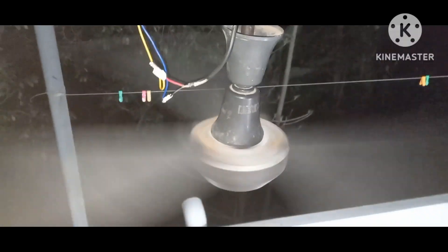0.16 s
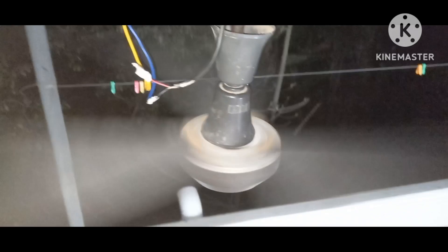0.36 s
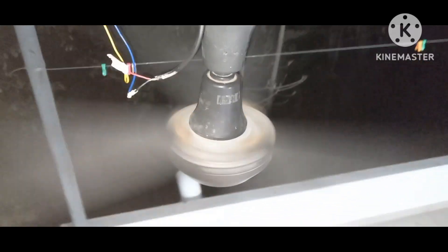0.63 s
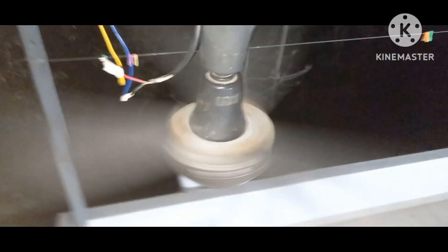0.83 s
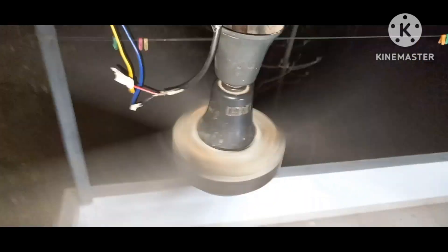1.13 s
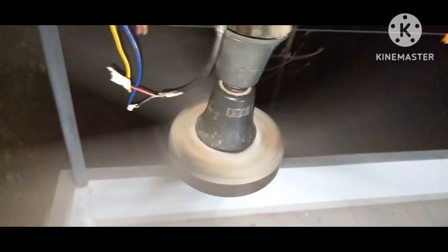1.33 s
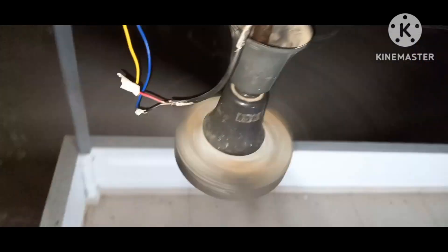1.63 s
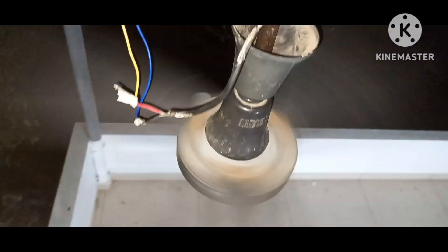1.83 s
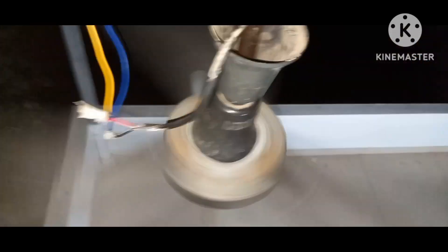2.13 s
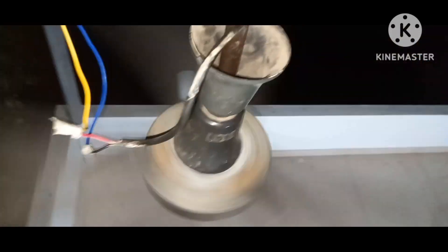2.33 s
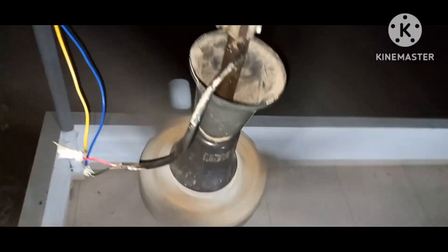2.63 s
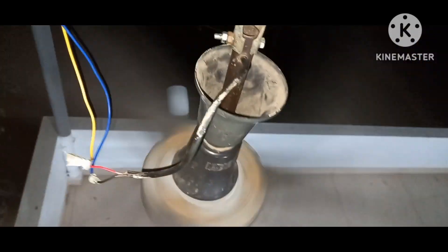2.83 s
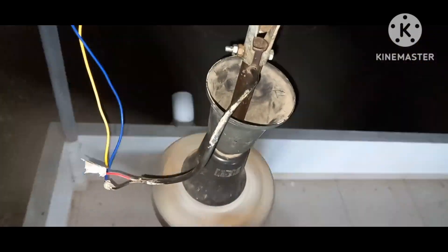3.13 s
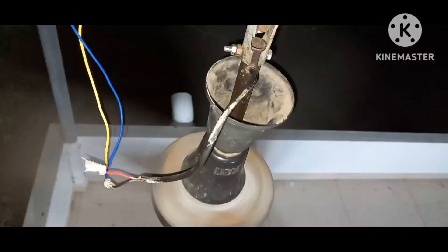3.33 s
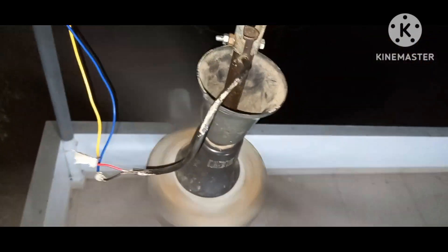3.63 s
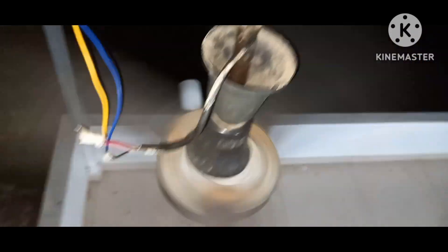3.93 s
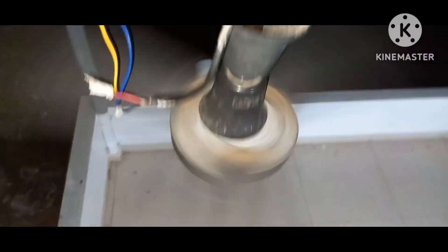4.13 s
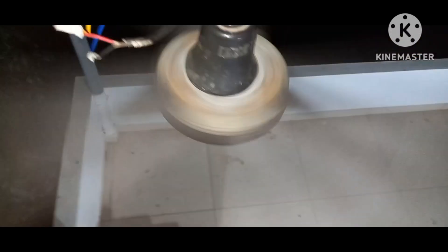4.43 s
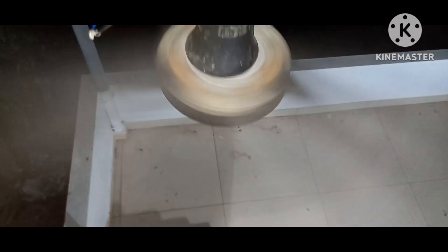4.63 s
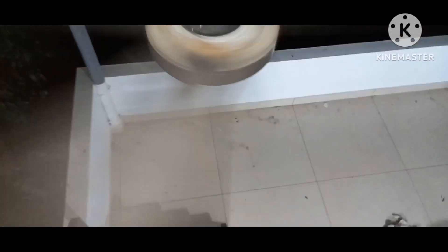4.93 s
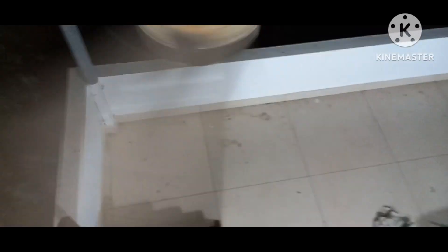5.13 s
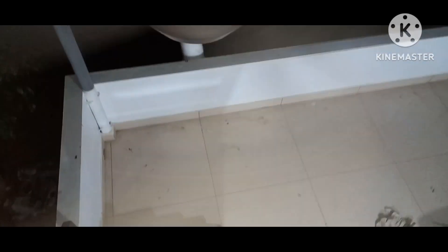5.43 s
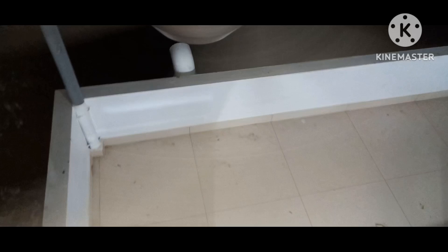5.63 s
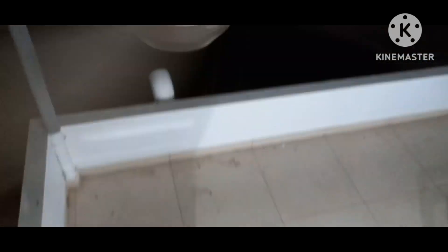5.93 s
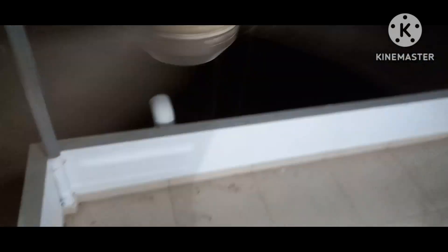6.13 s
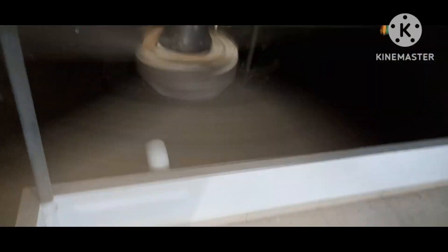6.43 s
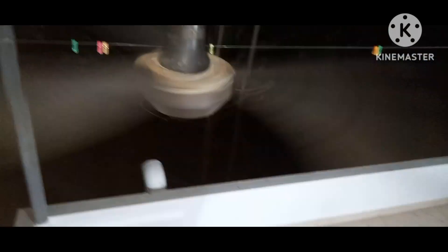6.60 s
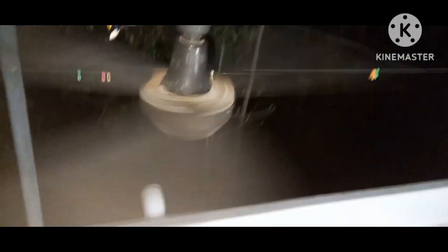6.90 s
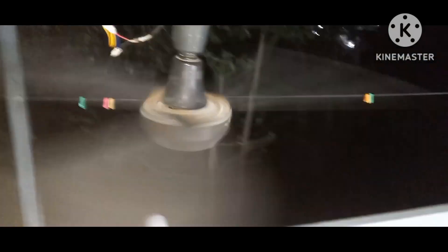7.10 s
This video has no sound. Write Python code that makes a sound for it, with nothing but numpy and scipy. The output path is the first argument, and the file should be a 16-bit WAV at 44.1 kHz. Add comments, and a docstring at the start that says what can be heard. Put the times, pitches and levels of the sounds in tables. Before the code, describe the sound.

Close, rapidly pulsing rush of air from a fast ceiling fan, with wind thumps, a faint motor whirr and high insect trilling.

```python
"""A throbbing rush of air: a three-blade ceiling fan at full speed on a roofed terrace at night.
Turbulence makes each blade swish and a pressure pulse follows it. As the microphone is lifted past the
blades and lowered again, interference with the roof's echo sweeps the rush and the draught buffets the
ports. The motor sings faintly, vortices shed at the blade edges whistle now and then, and insects
shrill in the trees with their resonant wings."""
import sys
import numpy as np
from scipy import signal
from scipy.fft import rfft, irfft, next_fast_len
from scipy.io import wavfile
from scipy.ndimage import uniform_filter1d, map_coordinates

SR = 44100
rng = np.random.default_rng(int(sys.argv[2]) if len(sys.argv) > 2 else 0)


def to_wav(sig):
    """Store sig (one row per channel, or 1-D mono) as 16-bit WAV at the path in sys.argv[1].

    Samples outside -1..1 are clipped; the rate is SR.
    """
    pcm = np.clip(np.atleast_2d(sig), -1, 1) * 32767
    pcm = np.round(pcm).astype(np.int16)
    wavfile.write(sys.argv[1], SR, pcm.T)  # frames by channels


N = 320166
TIME = np.arange(N) / SR
BLADE_HZ = 15.2  # blade passes a second

# the microphone's path: (time [s], delay of the roof's echo [ms], place round the hub [blade gaps])
MIC_PATH = [(0, 1.31, 0.52), (.9, 1.24, 0.74), (1.6, 1, 0.72), (2.2, 0.77, 0.608), (3.5, 0.42, 0.6),
            (4, 0.52, 0.81), (4.4, 0.99, .83), (4.9, 1.23, 0.798), (5.5, 1.41, 0.98), (6.3, 1.57, 1),
            (7.26, 1.61, 0.96)]
# base levels of the fan at the microphone: (time [s], high rush [dB], low rush [dB])
RUSH_LEVELS = [(0.1, -46, -32.5), (0.68, -45, -31.5), (1.05, -40, -26), (1.35, -38, -24),
               (1.6, -41.5, -28.5), (2.3, -40.5, -27), (2.95, -40.5, -26.5), (3.52, -37, -24),
               (3.8, -40.0, -25.5), (4.5, -38.5, -25), (5.25, -38.5, -26), (5.7, -37, -22.5),
               (6.25, -36, -21.5), (6.65, -39, -23.5), (7.02, -38, -23.5), (7.25, -42, -22.5)]


def amp(db):
    """Decibels to amplitude ratio."""
    return 10 ** (np.asarray(db) / 20)


def unit(x):
    """Normalisation to rms 1."""
    return x / np.sqrt(np.mean(x ** 2) + 1e-20)


def along(points, hz):
    """Interpolation of (frequency [Hz], value) points on a logarithmic axis."""
    knots_hz, values = np.transpose(points)
    return np.interp(np.log(hz + 1), np.log(knots_hz + 1), values)


def curves(rows):
    """Linear interpolation in time: one value per sample for each column after the first."""
    times, *columns = np.transpose(rows)
    return [np.interp(TIME, times, column) for column in columns]


def spell(at, length):
    """A Gaussian envelope of height 1; length is its full width at 1/e."""
    return np.exp(-(2 * (TIME - at) / length) ** 2)


def wobble(rate):
    """Smooth random modulation, rate knots a second."""
    return map_coordinates(rng.standard_normal(int(N * rate / SR) + 4), [TIME * rate])


def filtered(x, response):
    """Linear filtering: the spectrum of x times a frequency response."""
    size = next_fast_len(N + SR // 2)
    return irfft(rfft(x, size) * response(np.fft.rfftfreq(size, 1 / SR)), size)[..., :N]


def colour(x, spectrum):
    """Spectral shaping, cut off at the spectrum's last point, at rms 1."""
    return unit(filtered(x, lambda hz: amp(along(spectrum, hz)) * (hz < spectrum[-1][0])))


def stereo_noise():
    """Partial coherence: white noise whose two sides are alike only at long wavelengths."""
    # likeness of left and right: (frequency [Hz], correlation [ratio])
    coherence = [(30, 0.37), (80, 0.9), (170, 0.98), (330, 0.85), (650, 0.73), (1200, 0.17), (2500, 0.05),
                 (5000, 0)]

    def mid_side_gains(hz):
        angle = np.arccos(np.clip(along(coherence, hz), -1, 1)) / 2
        return np.array([np.cos(angle), np.sin(angle)])

    mid, side = filtered(rng.standard_normal((2, N)), mid_side_gains)
    return np.array([mid + side, mid - side])


def delayed(x, delay_ms):
    """Propagation delay over a path of changing length."""
    return np.array([np.interp(TIME - delay_ms / 1000, TIME, side) for side in x])


def insects(chirp_hz, chirp_db, stroke_db, tooth_db):
    """Stridulation: wing strokes, three to a chirp, modulate narrow resonances; one insect stands out."""
    # base level of the shrill treble: (time [s], level [dB])
    levels = [(.1, -49.5), (.7, -51.5), (1.05, -43), (1.38, -43), (1.58, -48.5), (3.5, -44.5),
              (3.85, -46.5), (5.2, -45.5), (5.94, -41.5), (6.65, -44), (7.26, -42)]
    # spectra of the chorus, the nearest wing and a higher wing: (frequency [Hz], density [dB])
    chorus_band = [(5600, -41.5), (6250, -14.5), (6500, 0.5), (6700, 2), (7050, -0.5), (7300, -4.5),
                   (7600, -6), (7900, -10), (8300, -27.5)]
    near_band = [(6200, -43), (6480, -7.5), (6660, 1), (6870, -6), (7070, -2.5), (7200, -17), (7400, -51)]
    high_band = [(7350, -39), (7520, -7), (7620, 1.5), (7720, -7), (7900, -40)]
    # faint thin bands near 9 and 15 kHz that follow the shrill's level: (frequency [Hz], density [dB])
    thin_bands = [(8700, -57.5), (9150, -4.5), (9400, 2.5), (9600, -21), (9900, -45), (14400, -44),
                  (14900, -8.5), (15400, -12.5), (15700, -31.5)]
    level_db, = curves(levels)
    phase = 2 * np.pi * (chirp_hz * TIME + 0.27 * wobble(2.7))
    pulse_db = chirp_db * np.cos(phase)
    strokes = np.cos(3 * phase) + 0.49 * np.cos(4 * phase)
    chorus = colour(stereo_noise(), chorus_band)
    chorus = unit(chorus * amp(pulse_db + 2.0 * strokes + tooth_db * wobble(400)))
    wing = colour(rng.standard_normal((2, N)), near_band)
    nearest = amp(-5.0) * unit(wing * amp(pulse_db + stroke_db * strokes))
    high_call = amp(-10.5) * spell(at=3.4, length=1.2) * colour(stereo_noise(), high_band)
    thin_treble = amp(-23.0) * colour(stereo_noise(), thin_bands)
    return amp(level_db + 1.5) * (chorus + nearest + high_call + thin_treble)


def motor(waver_rad, shell_db_per_ms, tone_db_per_ms, whirr_db, wander):
    """Resonance: the motor's shell whirrs beside its unsteady tones; both are clearest from above."""
    # the motor's tones: (frequency [Hz], base level [dB])
    partials = [(1136, -51), (2280, -52.5), (2375, -55.5)]
    # resonances of the shell: (frequency [Hz], bandwidth [Hz], base level [dB])
    modes = [(434.4, 27, -41.5), (486.8, 170, -40), (1310, 44, -48), (1637, 99, -45), (1925, 160, -52.5),
             (2290, 220, -52.5)]
    tones = np.zeros((2, N))
    for hz, db in partials:
        gain = amp(db + 3.6 * np.array([wobble(16.0), wobble(3.1)]))
        tones += gain * np.sin(2 * np.pi * hz * TIME + waver_rad * wobble(24))
    shell = np.zeros((2, N))
    for hz, width, db in modes:
        ring = filtered(stereo_noise(), lambda f: 1 / (1 + (2 * (f - hz) / width) ** 2))
        clock = np.cumsum(1 + wander * width / hz * wobble(BLADE_HZ))  # an uneven pace bends the pitch
        ring = np.array([map_coordinates(side, [clock], order=1, mode="mirror") for side in ring])
        shell += amp(db) * unit(ring * amp(whirr_db * wobble(2 * BLADE_HZ)))
    roof_ms = curves(MIC_PATH)[0]
    tones *= unit(amp(-tone_db_per_ms * roof_ms))
    shell *= unit(amp(-shell_db_per_ms * roof_ms))
    nearness = unit(amp(curves(RUSH_LEVELS)[0]))
    return nearness * (tones + shell)


def edge_whistle(waver, grain_db):
    """Vortex shedding at the blade edges gives narrow-band noise that swells, fades and wavers."""
    # whistling spells: (time [s], length [s], pitch [Hz], bandwidth [Hz], level [dB])
    whistles = [(1.901, .12, 4730, 621.4, -47), (2.25, 0.71, 4680, 618, -46.5),
                (4.246, 0.45, 5060, 617, -47.5), (6.125, 0.07, 4860, 580, -31),
                (6.181, 0.21, 4860, 652, -42), (6.345, 0.12, 4910, 756, -39), (7.038, 0.5, 4680, 383, -46)]
    times, _, hz, width_hz, _ = np.transpose(whistles)
    level = np.sqrt(sum((amp(db) * spell(at, length)) ** 2 for at, length, _, _, db in whistles))
    width = np.interp(TIME, times, width_hz)
    pitch = np.interp(TIME, times, hz) + waver * width * wobble(50)
    clock = np.cumsum(width) / SR
    vortices = np.array([map_coordinates(side, [clock]) for side in rng.standard_normal((2, N // 20))])
    carrier = np.sin(2 * np.pi * np.cumsum(pitch) / SR)
    return level * unit(vortices * carrier * amp(grain_db * wobble(140)))


def panned(db, pan_db):
    """Left and right gains with a level difference of pan_db."""
    return amp([[db + pan_db / 2], [db - pan_db / 2]])


def draught(lumps_db):
    """Turbulent pressure buffets each port on its own; a light flow and gusts add in power."""
    # gusts across the ports: (time [s], length [s], level [dB], left minus right [dB])
    gusts = [(0.854, 0.16, -32, -9), (1.125, 0.38, -26.5, 13.5), (1.403, 0.28, -21, 0.5),
             (1.81, 0.89, -28.5, -19), (2.19, 0.12, -27.5, 14), (3.686, 0.17, -25.5, 2),
             (3.937, 0.98, -25, -8)]
    # spectrum of the buffeting: (frequency [Hz], density [dB])
    buffet_band = [(15, -25), (33, -18), (55, -20.5), (68, 1), (78, -0.5), (98, -1), (113, -11.5),
                   (135, -2.5), (160, -7.5), (230, -14), (320, -17), (480, -35.5)]
    flow = amp(curves(RUSH_LEVELS)[0] + 4.5)
    gust_power = sum((panned(db, pan_db) * spell(at, length)) ** 2 for at, length, db, pan_db in gusts)
    lumps = amp(lumps_db * np.array([wobble(22), wobble(22)]))
    buffeting = unit(lumps * colour(rng.standard_normal((2, N)), buffet_band))
    return np.sqrt(flow ** 2 + gust_power) * buffeting


def eddies(cycles, thump_hz, shortening):
    """An eddy on the microphone is a brief pressure wavelet: the smaller, the higher and more abrupt. A few of
    the low knocks are pulses of passing blades, played the same way."""
    # low thumps and sharp slaps, among them a few low knocks of passing blades: (time [s], relative peak [dB],
    # pitch [Hz], left minus right [dB])
    impacts = [(.742, -9, 600, 2), (1.007, -10, 149, 6), (1.09, -11, 99, 19), (1.177, -7, 91, 17),
               (1.267, -6.5, 134, 13), (1.366, -5, 107, -6), (1.42, -21, 50, 0), (1.493, -0.5, 90, -2),
               (1.552, -4, 122, 3), (1.66, -9.5, 87, -11), (1.73, -4.5, 255, -4), (1.75, -19, 45.3, -4),
               (1.929, -8, 85, -1), (2.616, -7, 373, 0), (2.818, -4, 96, 2.5), (3.246, -6, 334, -2),
               (3.32, -6, 452, 0), (3.363, -8, 424, -5), (3.472, -6, 339, 1), (3.51, -5, 395, 7),
               (3.541, -7, 420, -8), (3.585, -1.5, 388, 4), (3.62, -2.5, 90, -1), (3.68, -17, 50, 1),
               (3.699, -5, 93, 2), (3.729, -11, 119, 3), (3.78, -8, 99, -6), (3.845, -6, 101, 4),
               (3.972, -3, 129, 2), (4.089, -6, 99, 0), (4.25, -3.5, 103, 2), (4.485, -8, 640, 5),
               (4.812, -10.5, 144, 0), (5.08, -5, 340, 1), (5.518, -6.5, 484, -1), (5.539, -8, 125, -1),
               (5.602, -5, 122, 0), (5.636, -6.5, 663, -1), (5.672, -4.5, 134, 1), (5.703, -1, 600, -3),
               (5.916, -1, 595, 0), (5.938, -9, 121, 1), (5.983, -5, 600, -1), (6.055, -1, 850, 2),
               (6.318, -6, 440, 5), (6.383, -9, 446, 5), (6.45, -5, 520, 4), (6.456, -3, 103, 2.5),
               (6.515, -4.5, 500, 2), (6.657, -8, 106, 2), (6.767, -10, 600, -1), (7.038, -5, 403, 0)]
    pressure = np.zeros((2, N))
    for (at, db, hz, pan_db), phase in zip(impacts, rng.random(len(impacts))):
        life = cycles * (thump_hz / hz) ** shortening  # life, age and phase are in cycles
        near = np.abs(TIME - at) < 4 * life / hz
        age = (TIME[near] - at) * hz
        wavelet = np.exp(-(age / life) ** 2) * np.sin(2 * np.pi * (age + phase))
        pressure[:, near] += panned(db, pan_db) * wavelet
    return amp(-8.0) * pressure


def throb(passes, swing_db, crest_db, lag=0, sharpness=3.0):
    """Amplitude modulation at the blade rate, deepest in the blades' plane, cresting as an edge cuts by."""
    wave = np.cos(2 * np.pi * (passes - lag))
    crest = np.exp(sharpness * (wave - 1))
    in_plane = np.clip(curves(MIC_PATH)[0], 0, 1.1)  # near the roof the microphone is above the blades
    uneven = 1 + 0.2 * wobble(15)  # every blade meets different air
    return unit(amp(in_plane * uneven * (swing_db * wave + crest_db * crest)))


def thrum(passes, pulse_share_per_ms, lumps_db, lag):
    """Blade-passing pressure: a pulse, clearer as the microphone sinks, and a wake trail each blade."""
    # spectrum of pulse and wake: (frequency [Hz], density [dB])
    push_band = [(15, -44.5), (35, -38.5), (55, -23.5), (66, -17.5), (77, -5), (98, 1.5), (112, -7.5),
                 (124, -2), (155, -10.5), (230, -15.5), (420, -36.5)]
    # swells and lulls: (time [s], length [s], level change [dB])
    swells = [(0.54, 0.085, -14), (1.05, 0.6, 5), (1.77, 0.33, -19), (2.49, 0.47, 0.5), (3.04, 0.32, -2.5),
              (4.008, 0.33, 1.5), (4.405, 0.19, -19), (5.1, 0.64, -2.5), (6.898, 1.4, 0.5)]
    count = np.arange(np.ceil(passes[0]), passes[-1] - 1)
    pulses = np.zeros(N)
    pulses[np.searchsorted(passes, count + lag)] = amp(2 * rng.standard_normal(len(count)))
    wake = rng.standard_normal(N) * throb(passes, swing_db=2.5, crest_db=0.5, lag=lag)
    wake = colour(wake * amp(lumps_db * wobble(20)), push_band)
    share = np.clip(pulse_share_per_ms * curves(MIC_PATH)[0], 0, 1)
    swell_db = sum(db * spell(at, length) for at, length, db in swells)
    level = amp(curves(RUSH_LEVELS)[0] + 14.5 + swell_db)
    return level * (np.sqrt(share) * colour(pulses, push_band) + np.sqrt(1 - share) * wake)


def roof_echo(x, delay_ms, echo, spread):
    """Comb filtering: the wide fan echoes over a spread of paths, which blurs the higher notches."""
    return x + echo * np.mean([delayed(x, delay_ms * (1 + spread * k)) for k in (-1, 0, 1)], axis=0)


def blade_reflection(passes, delay_ms, glide_ms, jitter_ms, echo=0.53, scatter_hz=5100):
    """Interference of noise with its reflection off a moving blade: peaks glide anew in each pass."""
    blade = np.floor(passes + .5).astype(int)
    start, slope = rng.standard_normal((blade.max() + 1, 2))[blade].T
    path_ms = np.abs(delay_ms + jitter_ms * start + glide_ms * (.5 + slope) * (passes - blade))
    direct = stereo_noise()
    mirrored = echo * delayed(direct, path_ms)
    # above scatter_hz a blade scatters sound instead of mirroring it
    return direct + filtered(mirrored, lambda hz: 1 / (1 + (hz / scatter_hz) ** 4))


def drift(x, depth_db):
    """Spectral modulation: the colour shifts slowly, in patches a few hundred hertz wide."""
    spectra = signal.stft(x, nperseg=512)[2]
    patches = uniform_filter1d(rng.standard_normal(spectra.shape[1:]), size=4, axis=0)
    patches = uniform_filter1d(patches, size=110, axis=1)
    return signal.istft(spectra * amp(depth_db * unit(patches)), nperseg=512)[1][:, :N]


def blades(passes):
    """Turbulence off the blades radiates throbbing noise: a hiss, and a whoosh and swish the roof combs."""
    # spectra of the low, middle and high rush: (frequency [Hz], density [dB])
    whoosh_band = [(110, -34), (190, -3.5), (300, 5), (400, -0.5), (550, -1), (700, -8), (1100, -41)]
    swish_band = [(380, -40.5), (600, -4), (750, 0), (950, 0), (1150, -1.5), (1310, -1.5), (1450, -6),
                  (1620, -5), (1790, -17), (2400, -54)]
    hiss_band = [(1300, -35), (1790, -4.5), (1900, -0.5), (2100, -1.5), (2400, -0.5), (3000, -4.5),
                 (3700, -6), (4400, -9.5), (5000, -10.5), (5600, -12.5), (7000, -8.5), (8200, -25)]
    # close blade tips swish louder and chop harder: (time [s], length [s], level change [dB])
    close_spells = [(1.895, 1.1, 0.94), (4.801, 1.5, 0.63), (6.092, 0.51, 0.34)]
    # chopping of the hiss along the path: (time [s], base swing [dB], lag [blade gaps])
    hiss_chop = [(2, -0.4, .1), (3, 1.5, .2), (4.5, 0.8, 0.28), (5.3, 1.1, 0.48), (5.6, 0.2, -0.16),
                 (6.1, 0.9, -0.02), (7.26, 1.2, -.05)]
    high_db, low_db = np.array(curves(RUSH_LEVELS)) + 0.68 * wobble(6)  # the whole rush surges a little
    roof_ms = curves(MIC_PATH)[0]
    close_db = sum(db * spell(at, length) for at, length, db in close_spells)
    close_crest_db = 1.8 * close_db
    flutter = np.tanh(wobble(80))

    whoosh = colour(roof_echo(stereo_noise(), roof_ms, echo=0.46, spread=0.064), whoosh_band)
    whoosh *= throb(passes, swing_db=1.5, crest_db=1.5 + close_crest_db)
    whoosh *= amp(1.2 * flutter + 1.2 * wobble(110) + 0.7 * wobble(22))

    swish = blade_reflection(passes, delay_ms=2.172, glide_ms=0.94, jitter_ms=0.666)
    swish = colour(roof_echo(swish, roof_ms, echo=0.37, spread=0.22), swish_band)
    swish *= throb(passes, swing_db=0.37 * roof_ms, crest_db=1.9 + close_crest_db)
    swish *= amp(1.1 * flutter + 2.15 * np.tanh(wobble(90)))

    hiss = blade_reflection(passes, delay_ms=0.885, glide_ms=0.56, jitter_ms=0.318)
    hiss = colour(drift(hiss, depth_db=1.34), hiss_band)
    chop_db, chop_lag = curves(hiss_chop)
    hiss *= throb(passes, swing_db=chop_db, crest_db=-0.1, lag=chop_lag)
    hiss *= amp(0.22 * flutter + 1.33 * wobble(60))

    # the swish gains on the whoosh as the microphone sinks and the echo's delay grows
    whoosh_db = low_db - 1.46 + 0.24 * roof_ms
    swish_db = low_db + close_db - 5.5 + 0.5 * roof_ms
    return amp(whoosh_db) * unit(whoosh) + amp(swish_db) * unit(swish) + amp(high_db + 3) * unit(hiss)


def scene():
    """Superposition of the fan close by, its wind and the insects behind it."""
    passes = BLADE_HZ * TIME + curves(MIC_PATH)[1]  # running count of blades past the microphone
    fan = blades(passes) + thrum(passes, pulse_share_per_ms=0.11, lumps_db=3.0, lag=0.1887)
    fan += motor(waver_rad=0.9, shell_db_per_ms=10.0, tone_db_per_ms=2.5, whirr_db=3.5, wander=.4)
    fan += edge_whistle(waver=.2, grain_db=2.7)
    wind = draught(lumps_db=3.0) + eddies(cycles=1.18, thump_hz=100, shortening=0.23)
    return fan + wind + insects(chirp_hz=18.4, chirp_db=1.65, stroke_db=3.0, tooth_db=2.0)


def record(dry):
    """Band limiting: the sound fades in and passes an ideal low-pass filter."""
    fade_s, top_hz = 0.079, 15750
    fade = np.clip(TIME / fade_s, 0, 1) ** 3
    return filtered(dry * fade, lambda hz: hz < top_hz)


dry = scene()
out = record(dry)
to_wav(out)
```